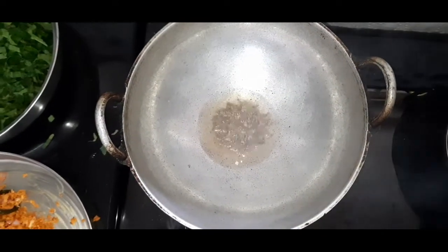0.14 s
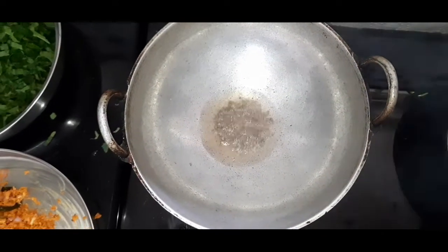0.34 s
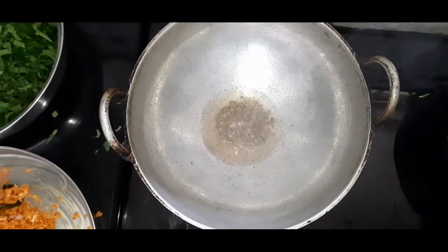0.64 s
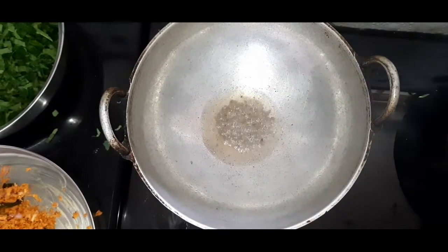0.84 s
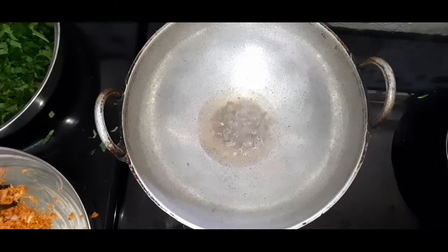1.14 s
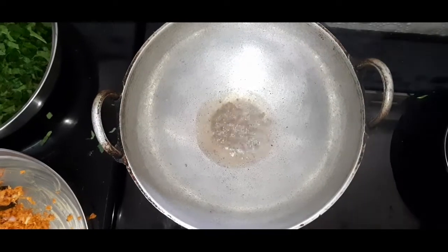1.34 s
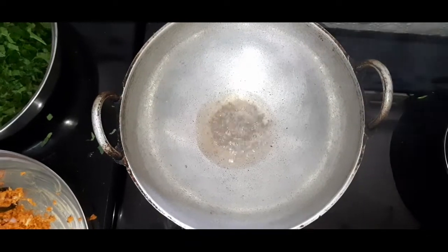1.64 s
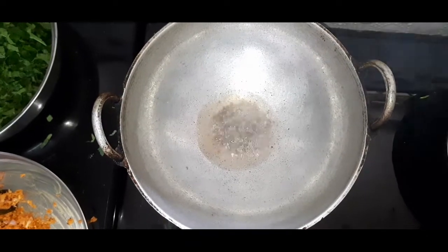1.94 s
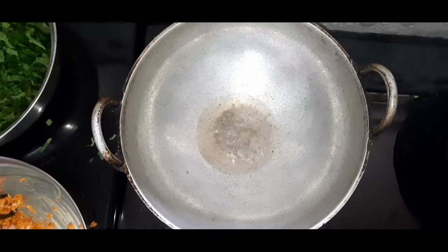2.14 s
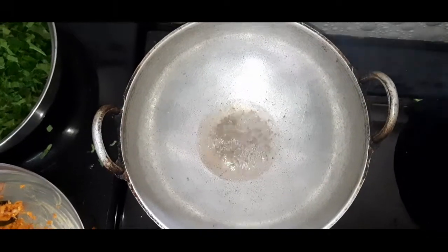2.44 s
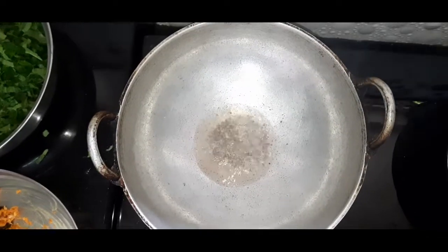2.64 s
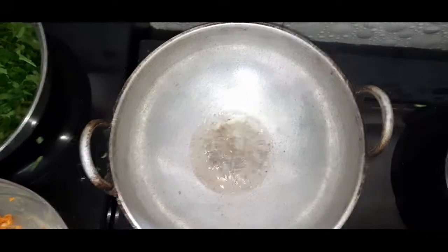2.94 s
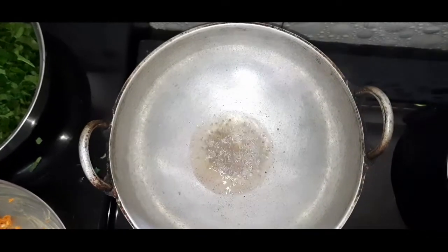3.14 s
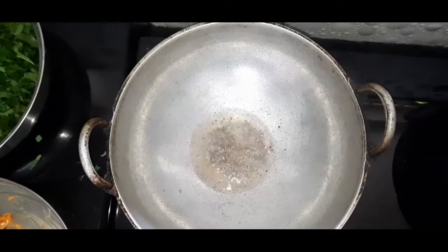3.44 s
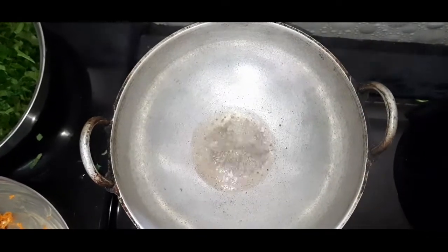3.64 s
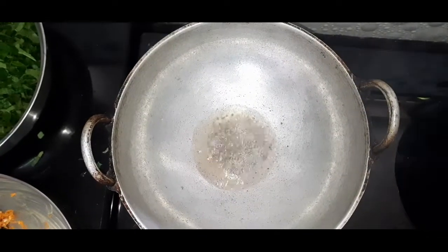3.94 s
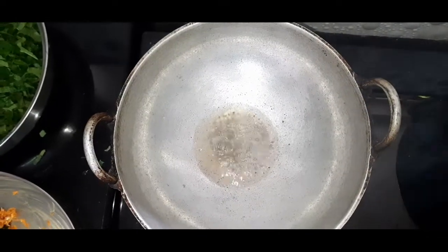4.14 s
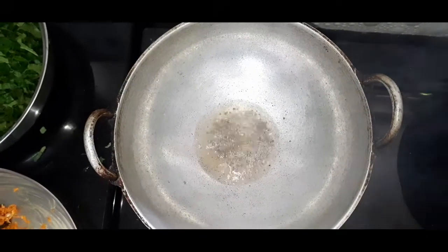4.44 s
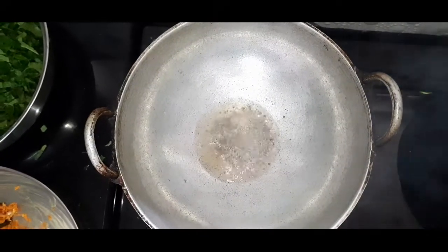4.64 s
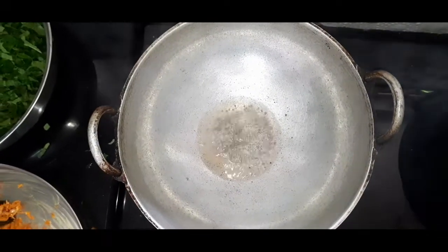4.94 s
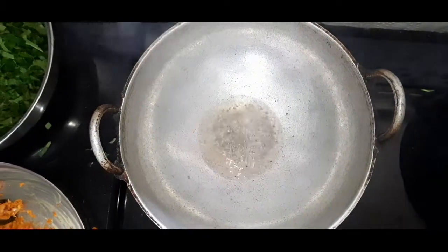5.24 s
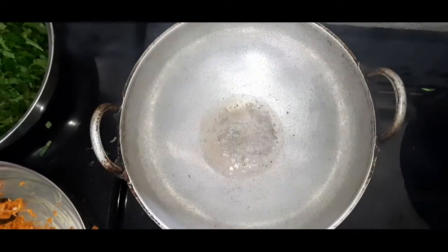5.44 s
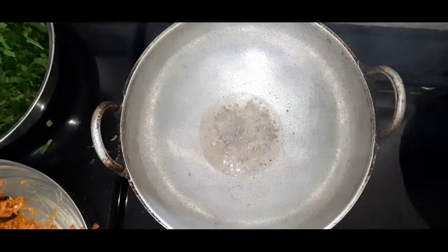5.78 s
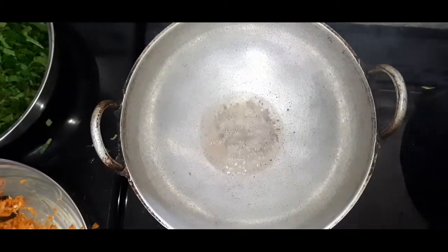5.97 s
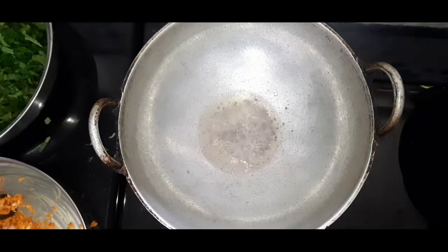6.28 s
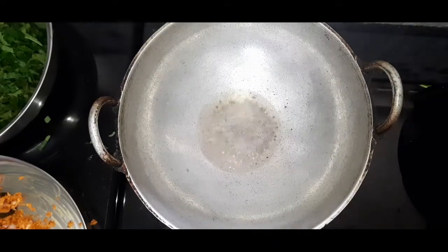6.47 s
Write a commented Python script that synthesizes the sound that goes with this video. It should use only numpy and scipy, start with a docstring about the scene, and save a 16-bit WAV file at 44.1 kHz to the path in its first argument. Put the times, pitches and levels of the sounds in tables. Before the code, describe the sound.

Small seeds pop in hot oil in a metal pan, scattered cracks thickening into a dense, hollow crackle over a fine sizzle.

```python
"""A small kitchen: mustard seeds pop in a spoonful of hot oil in a metal wok, heard from just above it. Each
seed splits with a crack (a push under a noise burst) and a short hollow ring near 2 kHz. The bowl answers with
tuned modes, the tiled room with an echo and dense, fading noise reflections. Oil sizzles as filtered noise and
tiny ticks; a bright hiss swells and dies after the sharpest snaps. The pops come thicker as it heats. Below lie
the noise of stove and room, a wavering hum and a soft swell of rumble."""
import sys
import numpy as np
from scipy import signal
from scipy.fft import rfft, irfft
from scipy.io import wavfile
from scipy.ndimage import uniform_filter1d

SR = 44100
rng = np.random.default_rng(int(sys.argv[2]) if len(sys.argv) > 2 else 0)


def unload_audio(sound):
    """Save the sound as a 16-bit wav file, at the path given as the first command line argument."""
    columns = np.transpose(np.atleast_2d(sound))
    # keep every value between -1 and 1, then stretch to whole-number steps
    steps = np.round(np.clip(columns, -1, 1) * 32767)
    wavfile.write(sys.argv[1], SR, steps.astype(np.int16))


N = 291501
TIME = np.arange(N) / SR

# The pops that stand out. Each row: start in seconds, ring level in dB before trim, ring pitch in Hz,
# crack level in dB before trim, brightness of the crack in dB.
SEED_POPS = [(0.0389, -38.5, 1970, -33.5, -17), (0.1621, -18.5, 1975, -22.5, 5),
             (0.5739, -25, 1800, -30, -4), (0.8607, -32, 1803, -36.5, -15), (0.878, -21, 2230, -31, 0),
             (0.936, -30, 2820, -36, 2), (1.0267, -28.5, 1940, -29, -23), (1.0482, -29, 1690, -37, 8),
             (1.148, -16.5, 2760, -23, 2), (1.1567, -21, 1760, -28, -13), (1.1894, -22.5, 2430, -24, -13),
             (1.2595, -17, 1790, -27.5, -8), (1.392, -29.5, 2490, -30.5, 6), (1.492, -21.5, 1820, -31, 1),
             (1.617, -34, 2420, -26.5, -11.5), (1.7047, -15.5, 1990, -25.5, 2),
             (1.7956, -30, 2570, -23.5, 37), (1.8103, -26, 2000, -29, -8), (1.833, -27.5, 2410, -24.5, 15),
             (2.148, -25.5, 1870, -34.5, -25), (2.3149, -27.5, 2600, -36.5, -13),
             (2.3495, -23.5, 1790, -21.5, -8.5), (2.376, -22.5, 2960, -27, 0),
             (2.4629, -24.5, 3230, -32, 2), (2.545, -23, 2150, -20, -9.5), (2.585, -21.5, 1950, -31, -6),
             (2.683, -20, 1700, -27, -13), (2.7087, -25, 2080, -20, -22), (2.738, -29.5, 1820, -22, 0.5),
             (2.8058, -19, 1890, -25.5, -9), (2.925, -17, 1800, -24, -5), (2.958, -17.5, 2040, -25, -12),
             (2.983, -30, 2020, -23.5, 28), (3.0446, -17, 2290, -24.5, -7),
             (3.1787, -22.5, 1870, -32.5, -14), (3.246, -16, 1980, -20, -21), (3.2559, -27.5, 1870, -34, 5),
             (3.334, -28.5, 2740, -28, -12), (3.3754, -31, 2620, -25, -7), (3.3991, -23, 1990, -27.5, 17),
             (3.4627, -17, 1860, -21.5, -2), (3.5, -24.5, 1850, -25.5, -2), (3.553, -14.5, 2040, -21, -21),
             (3.571, -24, 2923, -25.5, 3), (3.6463, -27, 2180, -21.5, 0), (3.73, -20, 1945, -30.5, -4),
             (3.773, -33, 2680, -24, -12), (3.7801, -24.5, 2680, -24, 6), (3.8869, -20, 1870, -25.5, 5),
             (3.9025, -13, 2040, -22, -4), (3.9234, -19, 2010, -26, -12), (3.9538, -26, 2340, -26, -5),
             (3.9823, -26.5, 2050, -28, 5), (3.9963, -25.5, 2940, -26, 4), (4.039, -20.5, 2770, -28.5, -4),
             (4.0717, -19.5, 2020, -20, -8.5), (4.1386, -23, 1790, -22, 2), (4.1951, -26, 2670, -33, 10),
             (4.2375, -22, 2040, -26.5, 9), (4.3266, -14, 1780, -25, 1), (4.3344, -17.5, 2530, -28.5, -9),
             (4.377, -28, 2177, -24, 0), (4.4226, -17.5, 1810, -22.5, 4), (4.45, -30, 2000, -23, -19),
             (4.4712, -25, 2300, -36, -12), (4.486, -21.5, 2260, -27, 1), (4.5424, -42, 1950, -24, -5.5),
             (4.569, -21, 2320, -36, -8), (4.7299, -29.5, 1564, -23.5, -9), (4.814, -25, 2420, -21.5, -4.5),
             (4.906, -28, 1780, -30.5, 9), (4.93, -12.5, 1740, -24, 3), (5.0375, -19.5, 1894, -33, 8),
             (5.0758, -21.5, 1800, -27.5, -14), (5.2014, -13.5, 1670, -22.5, -16),
             (5.2484, -25, 2660, -28, 3), (5.343, -18, 1810, -25.5, -9), (5.3549, -24, 1770, -34, -3),
             (5.3877, -24.5, 1780, -28.5, -11), (5.4085, -31.5, 1975, -25, -23),
             (5.451, -20.5, 1870, -38, 8.5), (5.5253, -18.5, 2200, -21, -12), (5.5647, -20, 2710, -25, -3),
             (5.6318, -18.5, 1940, -26.5, -5), (5.677, -20, 1790, -22.5, 9),
             (5.6846, -26, 1720, -20.5, -14), (5.745, -25, 1880, -24.5, 2), (5.753, -21.5, 2277, -25.5, -8),
             (5.7849, -17, 1810, -23.5, -3), (5.809, -19, 1890, -25.5, -8), (5.8783, -23, 2000, -34, -16.5),
             (5.9114, -24, 2120, -27, -5), (5.9161, -27, 1900, -22, 10), (5.9374, -21.5, 1990, -28, 0),
             (5.959, -17.5, 1820, -24.5, -6), (6.02, -19, 2100, -20.5, -1), (6.075, -25, 1984, -27.5, -10),
             (6.1314, -12.5, 1810, -21, -3), (6.1774, -17.5, 1830, -20, 1), (6.2042, -24.5, 2280, -19.5, 1),
             (6.2114, -22, 2440, -27, -4), (6.2547, -24.5, 1860, -24.5, 2), (6.301, -20, 1960, -23.5, 3),
             (6.314, -17.5, 1960, -21.5, 0), (6.3551, -27, 1910, -24, -5), (6.4288, -33, 1700, -30, -13),
             (6.4453, -32, 2040, -33, 28), (6.4702, -23, 1830, -19.5, -10), (6.579, -16.5, 2140, -27, -5)]
# Dry snaps of husks clear of the oil, with no ring. Each row: start in seconds, crack level in dB
# before trim, brightness in dB.
HUSK_SNAPS = [(0.322, -29, 28), (0.5577, -30.5, -20), (0.726, -31.5, -23), (0.9524, -29.5, -4),
              (1.142, -27, -21), (1.2103, -30, 1), (1.241, -18.5, 0.5), (1.673, -28.5, 5),
              (1.8816, -20.5, 45), (1.924, -30.5, 1), (1.9868, -31, 17), (2.12, -26.5, 8.5),
              (2.5662, -29, 4), (2.6194, -23, 22), (2.6614, -24, -10), (2.7761, -23.5, 25), (2.824, -27, 0),
              (2.898, -29.5, -9), (3.2801, -28.5, 4), (3.5348, -25.5, -3), (3.6687, -23, -13),
              (4.751, -23, 36), (5.3299, -22, -6), (5.352, -19.5, 1), (5.4403, -17, 2), (5.8428, -39, -11),
              (6.01, -23.5, -3)]
# Bubbles of steam that burst without a crack. Each row: start in seconds, ring level in dB before trim,
# ring pitch in Hz.
STEAM_BUBBLES = [(0.2463, -34.5, 1920), (0.291, -34, 1780), (0.4234, -26, 1894), (1.775, -29, 1850),
                 (3.1594, -30, 1910), (3.2044, -32, 1980), (3.597, -24.5, 1630), (4.442, -25, 1980),
                 (4.6429, -29, 2010), (4.826, -29, 2000), (4.8955, -28, 2000), (5.2812, -34, 1950),
                 (5.638, -17.5, 2020), (5.775, -23, 1900), (6.0601, -24.5, 1810), (6.089, -20, 1950),
                 (6.562, -28, 1900)]
# Ragged sputters of many tiny bursts. Each row: start in seconds, length in seconds, level of a burst
# in dB before trim.
OIL_SPUTTERS = [(1.15, .11, -46), (1.712, .09, -45.5), (1.798, .07, -42), (2.648, 0.115, -49),
                (4.449, 0.03, -35), (5.069, .012, -29.5), (5.364, .09, -41), (6.477, 0.05, -38.5)]
# The sharpest snaps, with the hiss and thump that follow. Each row: start in seconds, hiss level in dB, # hiss
# t60 in seconds, thump peak in dB.
SHARPEST_SNAPS = [(1.2414, -21, 0.22, -21), (1.796, -31, 0.28, -26), (1.882, -33.5, 1, -20.5),
                  (2.6195, -37, 0.45, -26), (2.9236, -60, 0.28, -15), (4.7294, -26, 0.21, -40),
                  (5.352, -44.5, 0.22, -18.5), (5.4404, -51, 0.28, -26)]
# Colour of a crack. Each row: frequency in Hz, relative level in dB.
CRACK_COLOUR = [(500, -14.5), (680, -5.5), (1050, -9.5), (1600, -3), (2700, 0), (4200, 2.5), (6800, 0),
                (8400, 3), (9800, 0), (15500, -3)]
# Treble balance of the two sides. Each row: frequency in Hz, left minus right in dB.
SIDE_BALANCE = [(2000, -0.5), (3300, 1.5), (5500, -1.5), (8200, -4.5), (10000, -3.5), (15000, -3.5)]
# Modes of the wok. Each row: centre of a close pair in Hz, relative level in dB, t60 in seconds.
WOK_MODES = [(267, -16, 0.45), (654, -13, 0.27), (750, -8, 0.022), (1500, 5, 0.0094), (1738, 6.5, 0.011),
             (1947, 2.5, 0.051), (2497, -4, 0.12), (2657, -1.5, 0.15), (3977, 2.5, 0.11)]
# Reverb decay of the kitchen. Each row: frequency in Hz, t60 in seconds.
ROOM_DECAY = [(400, 0.13), (1800, 0.31), (4000, 0.3), (9000, 0.24), (15000, 0.28)]
# Steady air of kitchen and stove. Each row: frequency in Hz, relative density in dB per Hz.
AIR_COLOUR = [(30, -25), (55, -3), (100, 9.5), (150, 2), (200, -11), (280, 6), (420, -1), (1000, -7),
              (1900, 4), (3200, -37), (6500, -5), (15000, -4)]
# Hum. Each row: frequency in Hz, rms level in dB before waver and left-right lean.
HUM_LINES = [(100, -70), (148, -74.5), (291, -66.5), (340, -75), (535, -71.5)]
# Soft swells of low rumble. Each row: centre in seconds, half length in seconds, pitch region in Hz,
# rms level at the crest in dB.
RUMBLE_SWELLS = [(0.277, 0.1, 68, -59)]

EARS = np.array([[1], [-1]])  # opposite signs for left and right
SAME_HZ = 1930  # below this the two sides hear nearly the same
# the oil boils harder as it heats: level at the start and climb, at the usual rate of popping
START_BOIL_DB, HEAT_DB_PER_S, USUAL_POPS_PER_S = -8.5, 1.48, 16.4
FLURRY_S = 0.12  # how long a flurry of pops keeps the oil stirred up
EDGE_HZ = 15750  # upper band limit of the recorder


def seeds(ring_db=0.06, crack_db=0.53, tick_db=-17, tick_s=0.0034,
          gulp_db=-14.0, gulp_s=0.0038, gulp_rise=0.87, gulps=4):
    """Rings and cracks; each listed pop has a faint tick up to a few ms before, and steam gulps after."""
    rings, cracks = np.zeros((2, 2, N))
    bursts = [*SEED_POPS, *small_pops(), *sputters()]
    ringing = [(s, db, hz) for s, db, hz, _, _ in bursts] + STEAM_BUBBLES
    cracking = [(s, db, bright_db) for s, _, _, db, bright_db in bursts] + HUSK_SNAPS
    for s, db, hz in ringing:
        add(rings, s, gain_of(ring_db + db) * ring(hz))
    for s, db, bright_db in cracking:
        add(cracks, s, gain_of(crack_db + db) * crack(bright_db))
    for s, low_db, hz, high_db, bright_db in SEED_POPS:
        tick_start = s - tick_s * rng.random()
        add(cracks, tick_start, gain_of(high_db + tick_db) * crack(bright_db))
        for wait, higher, weak in rng.random((gulps, 3)):
            level_db = low_db + gulp_db - 10 * weak * higher  # higher gulps tend to be weaker
            gulp = ring(hz * (1 + gulp_rise * higher))
            add(rings, s + gulp_s * wait, gain_of(level_db) * gulp)
    return rings, cracks


def crack(bright_db, scatter_s=0.00096, span_s=0.0042, hinge_hz=6500, thin=0.51, body_hz=1300, size=512):
    """The husk splits: a clean push under a ragged burst; a dull one rasps longer with little bass."""
    t, hz = np.arange(size) / SR, np.fft.rfftfreq(size, 1 / SR)
    life = scatter_s * np.exp(.25 * rng.standard_normal() - min(bright_db, 18) / 25)
    noise = irfft(pair(rfft(rng.standard_normal((3, size))), hz))
    burst = noise * np.exp(-t / life)
    push = np.sqrt(life * SR / 2) * signal.unit_impulse(size)
    treble_db = bright_db * hz ** 4 / (hz ** 4 + hinge_hz ** 4)
    bass_db = thin * min(bright_db, 0) / (1 + (hz / body_hz) ** 4)
    split = cut(burst, body_hz, "high") + cut(push, body_hz, "low")
    sound = tint(split, crack_colour(hz) + (treble_db + bass_db))
    return level_over(sound, span_s)


def ring(hz, t60=0.0098, rough=0.22, rise_s=0.00019, span_s=0.0013, lean_db=2,
         tuned_hz=1900, settle_s=0.001, size=2048):
    """The burst of steam rings hollow for a few cycles, longest near the pitch of the bowl."""
    t = np.arange(size) / SR
    damping, turn, side, bend = rng.standard_normal(4)
    life = t60 * np.exp(.2 * damping - 1.2 * abs(np.log(hz / tuned_hz)))
    shape = (1 - np.exp(-t / rise_s)) * gain_of(-60 * t / life)
    # the pitch starts off its mark and settles as the crater in the oil opens
    pitch = hz * np.exp(.07 * bend * np.exp(-t / settle_s))
    cycles = np.cumsum(pitch) / SR
    # its wall flutters, which roughens the tone
    flutter = rough * evened(uniform_filter1d(rng.standard_normal(size), size=24))
    # short waves arrive further out of step at the two microphones
    skew = .15 * turn * (hz / tuned_hz) ** 3
    tone = np.sin(2 * np.pi * cycles + flutter + EARS * skew)
    return level_over(shape * tone * gain_of(EARS * lean_db * side), span_s)


def small_pops(count=320, ring_db=-40.0, crack_db=-39.5, spread_db=3.0, follow=0.74, centre_hz=2100):
    """Rows for the faint seeds, more of them and louder as the oil boils harder."""
    boil_db = boil()
    share = np.cumsum(gain_of(boil_db))
    s = np.interp(rng.random(count), share / share[-1], TIME)
    size, hollow, pitch, bright = np.clip(rng.standard_normal((4, count)), -2, 2)
    level_db = follow * np.interp(s, TIME, boil_db) + spread_db * size
    ring_level_db = ring_db + level_db + 2 * hollow
    crack_level_db = crack_db + level_db - 2 * hollow
    return np.transpose([s, ring_level_db, centre_hz * np.exp(.2 * pitch), crack_level_db, 4 * bright - 5])


def sputters(bursts_per_s=300, ring_hz=2400, spread_db=0.0, bright_db=-7):
    """Rows for the tiny bursts that crowd into each sputter."""
    rows = []
    for s, length, db in OIL_SPUTTERS:
        traits = np.clip(rng.standard_normal((round(length * bursts_per_s), 3)), -2, 2)
        for hollow, pitch, size in traits:
            start = s + length * rng.random()
            hz = ring_hz * np.exp(pitch / 10)
            rows.append((start, db + spread_db * hollow, hz, db + spread_db * size, bright_db))
    return rows


def aftercrackle(splinter_db=-17.0, bubble_db=-19, trail_s=0.027, fade_db=9, ragged_db=4.5,
                 pitch_spread=.2, bubble_hz=2150, bright_db=-12, count=5):
    """Splinters and droplets fall back into the oil: a fading trail of ticks and bubbles after each pop."""
    rings, cracks = np.zeros((2, 2, N))
    for s, low_db, _, high_db, _ in SEED_POPS:
        for wait, (size, pitch) in zip(rng.random(count), rng.standard_normal((count, 2))):
            start = s + trail_s * wait
            db = ragged_db * size - fade_db * wait
            bubble = ring(bubble_hz * np.exp(pitch_spread * pitch))
            add(cracks, start, gain_of(high_db + splinter_db + db) * crack(bright_db))
            add(rings, start, gain_of(low_db + bubble_db + db) * bubble)
    return rings, cracks


def thumps(pulse_s=0.00024):
    """A short thump under each of the sharpest snaps: a pulse that swings back below zero."""
    out, u = np.zeros((2, N)), np.arange(SR // 20) / SR / pulse_s
    pulse = np.tile((1 - u) * np.exp(-u), (2, 1))
    for s, _, _, db in SHARPEST_SNAPS:
        add(out, s, gain_of(db) * pulse)
    return out


def snap_hiss(rise_s=0.0084, low_cut_hz=1200):
    """After each of the sharpest snaps a bright hiss swells in and dies away: high-passed noise in the colour
    of the cracks."""
    level = np.zeros(N)
    for s, db, t60, _ in SHARPEST_SNAPS:
        age = np.maximum(TIME - s, 0)
        level += gain_of(db - 60 * age / t60) * (1 - np.exp(-age / rise_s))
    hiss = cut(crackled(rng.standard_normal((2, N))), low_cut_hz, "high", order=1)
    return level * evened(hiss)


def wok(x, level_db=-48.5, apart_hz=4500, uneven_db=3, split=0.011, count=160):
    """Pops ring the metal bowl in close pairs of modes, struck more or less by where the seed lies."""
    t, out = np.arange(SR // 3) / SR, np.zeros((2, N))
    for k, (centre_hz, db, t60) in enumerate(WOK_MODES):
        for hz in centre_hz * (1 - split), centre_hz * (1 + split):
            # high modes differ more between the sides
            skew = (-1) ** k * EARS * (hz / apart_hz) ** 2
            mode = gain_of(db - 60 * t / t60) * np.cos(2 * np.pi * hz * t + skew)
            struck = x * gain_of(uneven_db * wander(count))
            out += signal.oaconvolve(struck, mode, axes=1)[:, :N]
    return gain_of(level_db) * out


def sizzle(level_db=-46, follow=0.3, clump_db=3.5, grain_db=-1.0, size=900):
    """Countless tiny bubbles of uneven size fuse into a frying wash of noise that follows the boil."""
    clumps = evened(signal.oaconvolve(rng.standard_normal(N), np.hanning(size), "same"))
    bubbles = gain_of(grain_db * evened(uniform_filter1d(rng.standard_normal(N), size=40)))
    wash = evened(crackled(bubbles * rng.standard_normal((2, N))))
    return gain_of(level_db + follow * boil() + clump_db * clumps) * wash


def fizz(level_db=-51, ticks_per_s=35, spread_db=4, cycles=1.6, count=12):
    """Pinhead bubbles tick all over the oil, each size at its own high pitch, louder as it boils."""
    t, out = np.arange(256) / SR, np.zeros((2, N))
    for hz in np.geomspace(2800, 14000, count):
        strength = gain_of(spread_db * np.minimum(rng.exponential(1, N), 4))
        ticks = (rng.random(N) < ticks_per_s / SR) * strength
        phase = rng.random((2, 1))  # in cycles, one for each side
        tick = np.exp(-t * hz / cycles) * np.sin(2 * np.pi * (hz * t + phase))
        out += signal.oaconvolve(ticks[None], tick, axes=1)[:, :N]
    return gain_of(level_db + boil() / 2) * evened(out)


def boil():
    """How hard the oil boils, dB: climbs with the heat, swells in flurries of pops and sinks in lulls."""
    coarse = TIME[::256]
    nearby = sum(np.exp(-.5 * ((coarse - s) / FLURRY_S) ** 2) for s, *_ in SEED_POPS)
    pops_per_s = np.interp(TIME, coarse, nearby) / (FLURRY_S * np.sqrt(2 * np.pi))
    flurry_db = 10 * np.log10((1 + pops_per_s) / USUAL_POPS_PER_S)
    return START_BOIL_DB + HEAT_DB_PER_S * TIME + flurry_db


def bounce(x, delay_s=0.0045, echo_db=-12):
    """A first echo off the nearest hard surface."""
    return gain_of(echo_db) * np.pad(x, ((0, 0), (round(delay_s * SR), 0)))[:, :N]


def kitchen(x, early_db=5, early_s=0.016, gap_s=0.0022, count=3):
    """Dense reflections, strongest early; three noise tails take turns, so the reverb changes slowly."""
    out = np.zeros((2, N))
    for k in range(count):
        hz, t, z = signal.stft(rng.standard_normal((3, SR // 2)), SR, nperseg=256)
        z = pair(z, hz[:, None]) * gain_of(-60 * t / read(ROOM_DECAY, hz)[:, None])
        tail = signal.istft(z, SR, nperseg=256)[1]
        age = np.arange(tail.shape[1]) / SR
        tail *= gain_of(early_db * np.exp(-age / early_s)) * (age > gap_s)
        turn = np.sqrt(2 / count) * np.cos(np.pi * (2 * TIME + k / count))
        out += signal.oaconvolve(x * turn, tail / np.linalg.norm(tail[0]), axes=1)[:, :N]
    return out


def air(air_db=-49.0, hum_db=0, waver=0.47, waver_db=3.0, split_hz=900, lean_db=4.5):
    """Stove rumble and hiss, alike on both sides in the bass, and a hum that wavers in pitch and level."""
    hz = np.fft.rfftfreq(N, 1 / SR)
    shared, *own = rfft(rng.standard_normal((3, N)))
    same = 0.75 / (1 + (hz / split_hz) ** 2)
    spectra = np.sqrt(same) * shared + np.sqrt(abs(1 - same)) * np.array(own)
    noise = irfft(spectra * gain_of(read(AIR_COLOUR, hz)), N)
    hum = np.zeros(N)
    for line_hz, db in HUM_LINES:
        drift = np.interp(TIME, np.linspace(0, TIME[-1], 90), np.cumsum(rng.standard_normal(90)))
        level = gain_of(db + hum_db + waver_db * wander(30)) * np.sqrt(2)  # rms to peak
        hum += level * np.sin(2 * np.pi * line_hz * TIME + waver * drift)
    return gain_of(air_db) * evened(noise) + hum * gain_of(lean_db * EARS)


def swells():
    """Low rumble swells softly: narrow noise under a bell-shaped level."""
    out = np.zeros(N)
    for s, half_s, hz, db in RUMBLE_SWELLS:
        rumble = evened(cut(cut(rng.standard_normal(N), hz, "low"), hz, "high"))
        out += gain_of(db) * np.exp(-.5 * ((TIME - s) / half_s) ** 2) * rumble
    return out


def crack_colour(hz):
    """Spectrum of a crack at the left and right microphone, dB."""
    return read(CRACK_COLOUR, hz) + .5 * EARS * read(SIDE_BALANCE, hz)


def crackled(x, size=512):
    """Gives a stereo signal the colour of the cracks."""
    kernel = tint(signal.unit_impulse(size), crack_colour(np.fft.rfftfreq(size, 1 / SR)))
    return signal.oaconvolve(x, kernel, axes=1)[:, :N]


def pair(spectra, hz):
    """Three unrelated spectra become left and right: long waves reach both microphones alike."""
    shared = 1 / (1 + (hz / SAME_HZ) ** 8)
    return np.sqrt(shared) * spectra[0] + np.sqrt(1 - shared) * spectra[1:]


def tint(x, db):
    """Causal (minimum-phase) filter with the given gain at each frequency of x."""
    size = x.shape[-1]
    # folding the cepstrum onto positive time makes the filter causal
    cepstrum = irfft(np.log(gain_of(db)), size)
    cepstrum[..., 1:size // 2] *= 2
    cepstrum[..., size // 2 + 1:] = 0
    return irfft(rfft(x) * np.exp(rfft(cepstrum)), size)


def cut(x, hz, kind, order=3):
    """High-pass or low-pass."""
    return signal.lfilter(*signal.butter(order, hz, kind, fs=SR), x)


def wander(count):
    """A random line through the given number of points over the whole scene."""
    return np.interp(TIME, np.linspace(0, TIME[-1], count), rng.standard_normal(count))


def gain_of(db):
    """Decibels to gain."""
    return 10 ** (np.asarray(db) / 20)


def evened(x):
    """Scales to rms 1."""
    return x / np.sqrt(np.mean(x ** 2) + 1e-20)


def level_over(sound, span_s):
    """Scales a short stereo sound so that its energy equals rms 1 over the span."""
    return sound / np.sqrt((sound ** 2).mean(0).sum() / (span_s * SR))


def read(points, hz):
    """Reads a table along a log-frequency axis."""
    f, value = np.transpose(points)
    return np.interp(np.log(hz + 1), np.log(f + 1), value)


def add(mix, s, sound):
    """Mixes a stereo sound in at time s."""
    part = mix[:, max(round(s * SR), 0):][:, :sound.shape[1]]
    part += sound[:, :part.shape[1]]


def scene(ring_room_db=-8.0, crack_room_db=-3):
    """Pops, oil and wok in the room; the cracks carry further into it than the rings."""
    rings, cracks = np.add(seeds(), aftercrackle())
    rings = cut(rings, 897, "high") + thumps()
    pops = rings + cracks
    metal = wok(pops)
    room = kitchen(gain_of(ring_room_db) * (rings + metal) + gain_of(crack_room_db) * cracks)
    oil = sizzle() + snap_hiss() + fizz()
    return pops + metal + bounce(cracks) + room + oil + air() + swells()


def record(dry, low_cut_hz=42):
    """The bass cut and band limit of the recorder."""
    band_limit = signal.firwin(301, EDGE_HZ, window=("kaiser", 9), fs=SR)
    return signal.oaconvolve(cut(dry, low_cut_hz, "high"), band_limit[None], "same", axes=1)


dry = scene()
out = record(dry)
unload_audio(out)
```